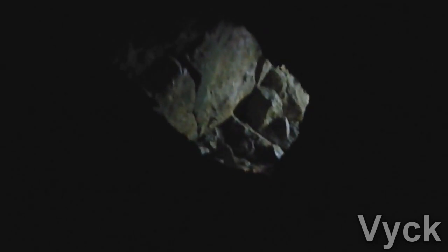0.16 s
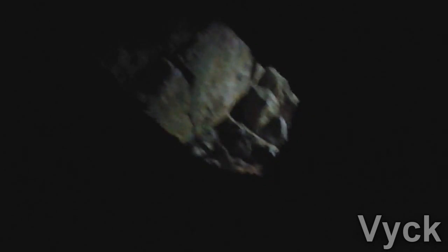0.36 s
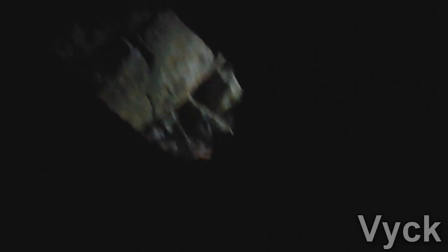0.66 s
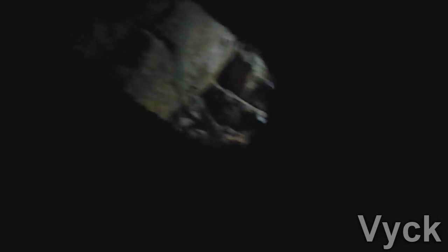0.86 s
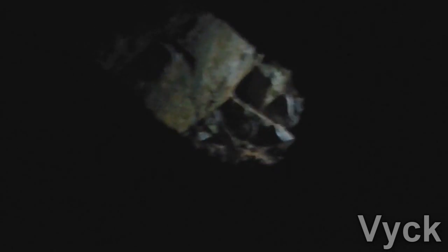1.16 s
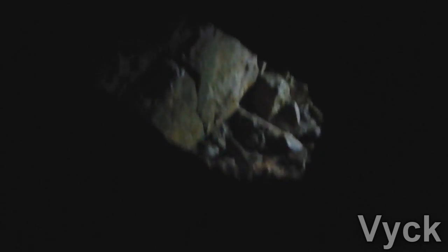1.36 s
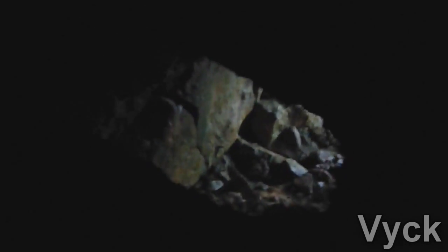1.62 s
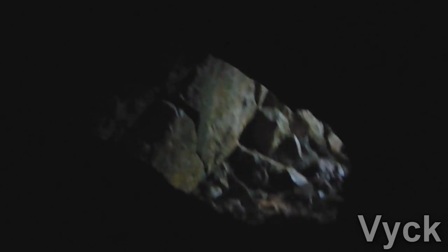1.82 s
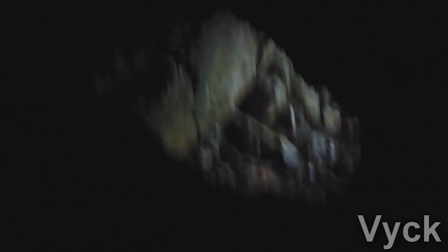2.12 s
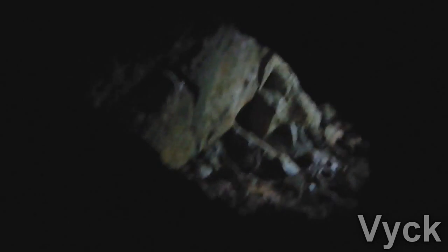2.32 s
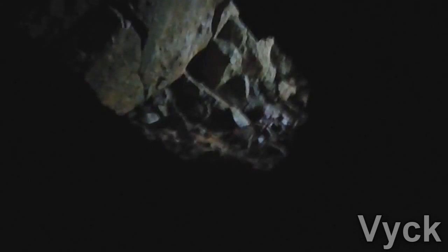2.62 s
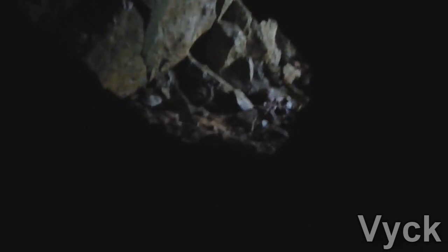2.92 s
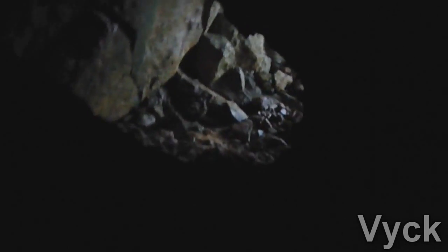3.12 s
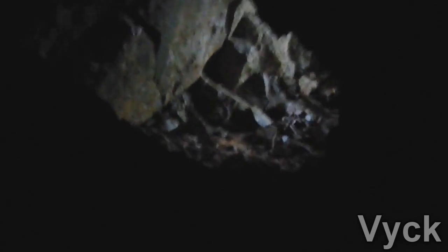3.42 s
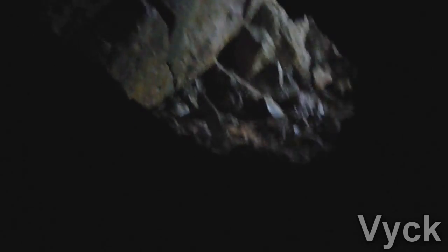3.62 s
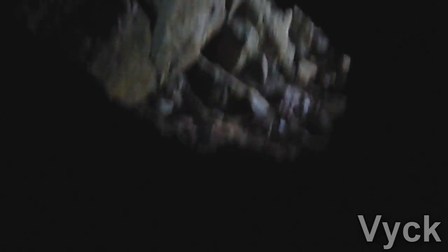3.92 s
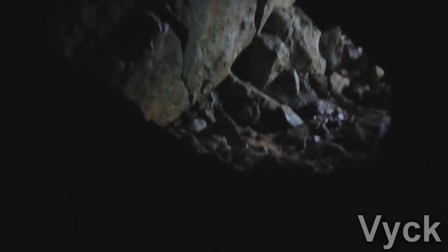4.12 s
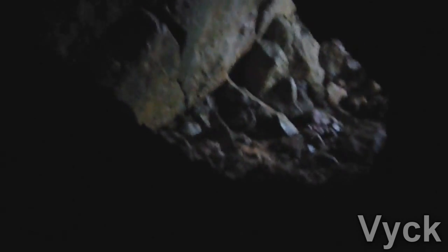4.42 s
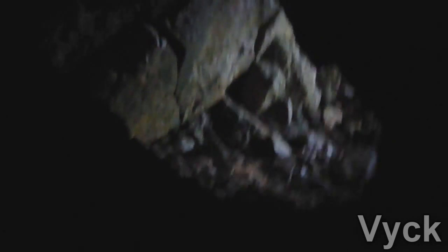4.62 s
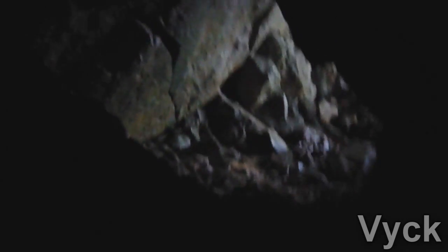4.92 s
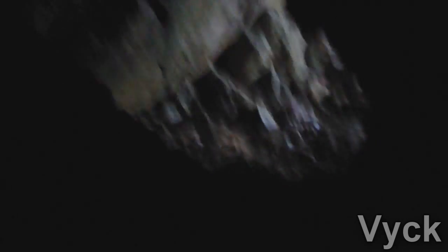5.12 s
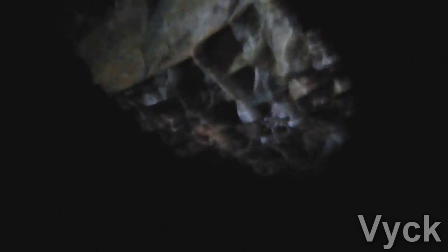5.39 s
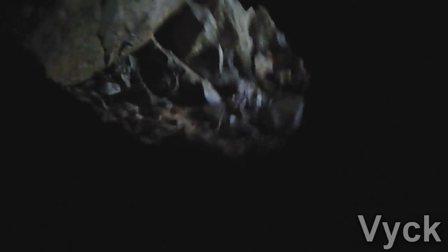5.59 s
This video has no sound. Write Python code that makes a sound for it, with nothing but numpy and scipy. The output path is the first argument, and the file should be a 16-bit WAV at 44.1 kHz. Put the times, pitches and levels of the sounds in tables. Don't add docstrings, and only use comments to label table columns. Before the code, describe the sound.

Someone walks over a heap of broken rock in a mine tunnel, heard close through a cheap, band-limited camera microphone with constant grainy hiss. Footsteps come in uneven bursts: stone clacks, gritty crunches, hollow knocks and low thuds, with small settling trickles between. The middle is busy with dragging; two very loud cracks distort near four seconds, and a strong scraping burst closes it. Rough walls give a brief echo.

```python
import sys
import numpy as np
from scipy import signal
from scipy.fft import rfft, irfft, next_fast_len
from scipy.io import wavfile
from scipy.ndimage import map_coordinates

SR = 44100
rng = np.random.default_rng(int(sys.argv[2]) if len(sys.argv) > 2 else 0)


def makeup_ratio(level_db):
    decades = np.asarray(level_db, float) / 20
    return 10 ** decades


def to_wav(sig):
    pcm = np.clip(np.atleast_2d(sig), -1, 1) * 32767
    pcm = np.round(pcm).astype(np.int16)
    wavfile.write(sys.argv[1], SR, pcm.T)


N = 253575


def unit(x):
    return x / np.sqrt(np.mean(x ** 2) + 1e-20)


def along(points, hz):
    point_hz, value = np.transpose(points)
    return np.interp(np.log(hz + 1), np.log(point_hz + 1), value)


def wobble(rate):
    knots = rng.standard_normal(int(N * rate / SR) + 4)
    return map_coordinates(knots, [np.arange(N) * rate / SR])


def coloured(x, points):
    size = next_fast_len(N + SR // 2)
    response = makeup_ratio(along(points, np.fft.rfftfreq(size, 1 / SR)))
    return irfft(rfft(x, size) * response, size)[..., :N]


def placed(times, sounds):
    at = np.round(times * SR).astype(int)[:, None] + np.arange(sounds.shape[1])
    return np.bincount(at.ravel(), sounds.ravel(), N + SR)[:N]


# (frequency [Hz], level per Hz [dB])
AIR_COLOUR = [(40, -19.5), (150, -10), (450, -1), (700, -4), (1500, -11.5), (4000, 3.5)]


def air():
    hush = unit(coloured(rng.standard_normal(N), AIR_COLOUR))
    return makeup_ratio(-48 + 0.29 * wobble(3.2)) * hush


# (frequency [Hz], time to fall 60 dB [s])
WALL_DECAY = [(150, 0.6), (1000, 0.33), (3500, 0.3)]


def tunnel(x):
    hz, t, noise = signal.stft(rng.standard_normal(SR // 2), SR, nperseg=256)
    fading = makeup_ratio(-60 * t / along(WALL_DECAY, hz)[:, None])
    tail = signal.istft(noise * fading, SR, nperseg=256)[1]
    late = np.pad(x, (150, 0))
    return signal.fftconvolve(late, tail / np.linalg.norm(tail))[:N]


# (time [s], peak level [dB], pitch [Hz], time to fall 60 dB [s])
HEEL_THUDS = [(0.636, -26.5, 190, 0.1), (0.785, -36, 180, 0.11), (1.016, -18.5, 342, 0.049),
              (1.59, -27, 135, 0.21), (1.83, -35, 361.4, 0.15), (1.917, -19, 138.5, 0.03),
              (2.136, -29.5, 146, 0.06), (2.549, -8, 255, 0.035), (2.67, -36, 190, 0.16),
              (2.856, -33, 254, 0.23), (2.911, -22.5, 226.6, 0.037), (3.038, -21, 314, 0.031),
              (3.674, -42, 166, 0.021), (3.817, -60, 136, 0.15), (4.043, -33.5, 152, 0.063),
              (4.149, -27, 213, 0.08), (4.345, -21, 140, 0.068), (4.872, -25.5, 153, 0.086),
              (5.093, -28.5, 193, 0.027), (5.172, -11, 283, 0.083), (5.348, -23.5, 318.6, 0.08),
              (5.529, -27, 328.5, 0.23), (5.6, -23, 285, 0.05), (5.642, -19, 142.5, 0.1)]


def thuds():
    s, db, hz, t60 = np.transpose(HEEL_THUDS)[..., None]
    t = np.arange(6000) / SR
    shape = makeup_ratio(-60 * t / t60) * (1 - np.exp(-t / 0.00078))
    shaken = 0.064 * np.cumsum(rng.standard_normal((len(s), len(t))), axis=1)
    rings = np.sin(2 * np.pi * hz * t + shaken)
    return placed(s[:, 0], makeup_ratio(db + 0.5) * shape * rings)


# (time of the top [s], peak level
# [dB], pitch [Hz])
STONE_NOTES = [(0.747, -19.5, 1143), (0.856, -17, 648), (1.018, -15, 690), (1.047, -12.5, 957),
               (1.065, -16, 940), (1.266, -14, 984), (1.301, -22.5, 784), (1.909, -23.5, 790),
               (2.228, -26.5, 818), (2.531, -19, 774), (2.553, -13.5, 1020), (2.605, -20.5, 880),
               (2.635, -19, 1063), (2.676, -20, 854), (2.765, -18, 860), (2.978, -24, 782),
               (3.092, -16, 947), (3.107, -15.5, 1156), (3.152, -18.5, 1090), (3.246, -19.5, 1093),
               (3.383, -17, 1064), (3.446, -14.5, 1073), (3.454, -14, 1240), (3.478, -21, 1117),
               (3.568, -28.5, 940), (3.634, -27.5, 1010), (3.927, -23.5, 910), (4.241, -26, 1030),
               (4.349, -24.5, 987), (4.789, -24, 1256), (4.87, -25, 1076), (5.022, -30, 1295),
               (5.079, -22, 1280), (5.16, -17.5, 522), (5.182, -14.5, 1147), (5.262, -24.5, 437),
               (5.376, -16, 1080), (5.402, -15, 1080), (5.411, -11.5, 990), (5.43, -15.5, 1115),
               (5.483, -24, 1030), (5.548, -17, 774), (5.616, -18.5, 1090), (5.647, -18, 887),
               (5.706, -21.5, 950),
               (0.331, -36, 1530), (0.746, -23.5, 1505), (0.786, -18.5, 1520), (1.05, -22, 2130),
              (1.112, -22.5, 3370), (1.176, -22, 1840), (1.301, -21, 1730), (1.456, -32, 1775),
              (1.542, -30, 1640), (2.184, -24.5, 2230), (2.368, -30, 1600), (2.543, -23.5, 3270),
              (2.545, -16, 1906), (2.607, -19.5, 2610), (2.682, -16.5, 2655), (2.726, -18.5, 2580),
              (2.831, -23.5, 1676), (2.87, -21, 2590), (2.88, -21, 2420), (2.88, -20, 3280),
              (2.889, -18.5, 1554), (3.043, -25.5, 2550), (3.063, -25, 2410), (3.081, -12, 1780),
              (3.093, -17.5, 2700), (3.114, -14.5, 1770), (3.115, -17, 2790), (3.151, -19, 2020),
              (3.284, -19.5, 2480), (3.285, -23, 3050), (3.299, -22.5, 2250), (3.33, -27, 3090),
              (3.382, -17, 2120), (3.385, -17.5, 1510), (3.42, -20.5, 2320), (3.421, -19, 3070),
              (3.527, -21.5, 2110), (3.567, -24, 1640), (3.604, -24.5, 3240), (3.631, -21.5, 2030),
              (3.72, -24, 2200), (3.759, -23.5, 2980), (3.93, -29, 3040), (3.934, -26, 2620),
              (4.198, -24, 2840), (4.286, -26.5, 3480), (4.341, -18.5, 2510), (4.342, -22, 3240),
              (4.344, -24, 1830), (4.777, -25.5, 3360), (4.87, -25, 1630), (5.021, -22, 2840),
              (5.021, -29.5, 2250), (5.021, -28, 3920), (5.078, -22, 2210), (5.079, -22, 1850),
              (5.308, -22, 2130), (5.374, -16, 2080), (5.377, -13.5, 2550), (5.407, -17.5, 1570),
               (.777, -24, 2900), (.82, -17, 2300), (.824, -18, 1300), (.862, -20, 1500),
                  (1.023, -17, 500), (1.057, -15, 900), (1.069, -17, 2200), (1.147, -19, 800),
                  (1.16, -21, 2900), (1.253, -25, 2500), (1.268, -21, 1700), (1.31, -23, 1050),
                  (1.6, -24, 600), (2.137, -28, 2800), (2.62, -17, 1600), (2.714, -20, 2500),
                  (2.786, -23, 900), (2.859, -23, 1650), (3.255, -19, 1200), (3.41, -19, 1100),
                  (3.508, -20, 2300), (3.857, -21, 1000), (4.161, -19, 1300), (4.17, -19, 1100),
                  (4.178, -22, 1500), (4.19, -21, 1200), (4.3, -27, 2900), (4.39, -29, 2800),
                  (4.426, -29, 1500), (4.775, -23, 2000), (4.825, -27, 2200), (5.179, -18, 330),
                  (5.217, -16, 900), (5.237, -18, 1000), (5.346, -19, 1100), (5.366, -18, 1150),
                  (5.395, -18, 2600), (5.583, -16, 900), (5.61, -17, 600), (5.635, -18, 800),
                  (5.68, -19, 1000)]


def notes():
    s, db, hz = np.transpose(STONE_NOTES)[..., None]
    t = np.arange(900) / SR
    rise_s = .0008 + 0.55 / hz
    u = t / rise_s
    swell = (u / 2) ** 2 * np.exp(2 - u)
    start = (s - 2 * rise_s)[:, 0]
    return placed(start, makeup_ratio(db + 0.3) * swell * np.sin(2 * np.pi * hz * t))


def resonance(f, hz, width_hz):
    return 1j * f * width_hz / (hz * hz - f * f + 1j * f * width_hz)


def stones(rows, push, low_width_hz, high_width_hz):
    s, db, low_hz, high_hz, share_db = np.transpose(rows)[..., None]
    f = np.fft.rfftfreq(push.shape[1], 1 / SR)
    high = np.clip(makeup_ratio(share_db), 0, 1)
    low = np.sqrt(1.02 - high ** 2)
    low_ring = low * resonance(f, low_hz, low_width_hz) ** 2
    high_ring = high * resonance(f, high_hz, high_width_hz) ** 2
    sound = irfft(rfft(push) * (low_ring + high_ring), push.shape[1])
    return placed(s[:, 0], makeup_ratio(db) * sound / abs(sound).max(axis=1, keepdims=True))


# (time [s], peak level [dB], low ring [Hz], high ring [Hz], share of the high ring [dB])
FEW_KNOCK = [(0.613, -50, 1340, 2130, -5), (0.852, -11.5, 638, 1670, -13.5), (1.046, -5, 930, 1650, -18),
             (1.172, -21, 1440, 1960, -8.5), (1.738, -24, 525, 1630, -5.5), (1.902, -18, 755, 1870, -18),
             (2.028, -20, 1590, 2640, -4), (2.484, -23.5, 1550, 1630, -10), (2.707, -11.5, 1630, 2730, 3),
             (2.969, -18, 764, 2590, -3), (3.146, -11.5, 1016, 2050, -18), (3.288, -7, 1035, 2210, 0.5),
             (3.411, -15, 1045, 3000, -7.5), (3.507, -10, 1110, 2400, -3), (3.757, -15, 1084, 2800, 3),
             (3.924, -10.5, 950, 1820, -5.5), (4.281, -15.5, 1026, 2770, -2.5), (4.297, -18, 1050, 2590, 3),
             (4.42, -22, 940, 1710, -9), (4.461, -20.5, 1320, 2830, -0.5), (4.688, -23, 1260, 2720, 1),
             (4.707, -23.5, 1255, 2500, 2), (4.342, -13.5, 1020, 2580, -1.5),
             (4.573, -26.5, 1140, 2840, -2.5), (4.784, -16, 1275, 1740, -8), (5.179, -6, 1160, 2070, -11),
             (5.406, -4.5, 1125, 1720, -7)]
# (time [s], peak level [dB], low ring [Hz], high ring [Hz], high share [dB])
HANDFUL_CRUNCH = [(0.643, -18, 1403, 2160, -5), (1.058, -6.5, 956, 1620, -7), (1.107, -13, 912, 1640, -4),
                  (1.26, -16, 1100, 1900, -5), (1.454, -30, 716, 1760, -5.5),
                  (1.833, -19.5, 620, 1580, -11), (2.134, -16.5, 700, 2020, 5.5),
                  (2.365, -18, 555, 1550, -5), (2.538, -5.5, 1100, 1630, -4), (2.673, -14.5, 804, 1770, -2),
                  (2.876, -10.5, 1650, 3100, -2.5), (3.188, -15.5, 1246, 2020, -14.5),
                  (3.255, -15, 1120, 1970, -15), (3.436, -6, 1057, 2250, -9), (3.856, -12, 890, 2960, -9),
                  (4.053, -16.5, 1040, 2500, -5), (4.546, -25, 863, 2360, -8),
                  (4.766, -11.5, 1210, 2090, -3), (4.821, -15.5, 1074, 2120, -2.5),
                  (5.099, -17, 970, 1800, -14), (5.305, -19, 890, 2170, -8), (5.344, -14, 1126, 2110, -14),
                  (5.428, -15, 1124, 1660, -4), (5.617, -12.5, 915, 2650, -4.5)]
# (time [s], peak level [dB], low ring [Hz], high ring [Hz], high share [dB])
MANY_SLIDE = [(1.541, -22.5, 1550, 1580, 1), (1.592, -19, 766, 1600, -5.5), (2.177, -16, 890, 2240, -8),
              (2.218, -16, 943, 1710, -2.5), (2.452, -23, 1240, 2060, -6), (2.869, -23, 1560, 3230, -8),
              (3.035, -15, 1010, 1650, -7.5), (3.077, -10, 953, 1680, -5), (3.112, -5, 1083, 1705, 2.5),
              (3.44, -9, 1070, 1890, -16), (3.717, -16, 904, 2270, -1.5), (3.792, -14, 766, 1870, -3),
              (4.078, -17.5, 1105, 2056, -15.5), (4.239, -26.5, 960, 1860, -16),
              (4.668, -19.5, 473, 1700, -6.5), (5.152, -15.5, 530, 1650, -19),
              (5.208, -14, 1340, 2400, -2.5), (5.558, -11.5, 715, 2710, -7.5),
              (5.588, -11, 1080, 2150, -0.5)]


def crunches():
    t = np.arange(4096) / SR
    rows = [*FEW_KNOCK, *HANDFUL_CRUNCH, *MANY_SLIDE]
    counts = [len(FEW_KNOCK), len(HANDFUL_CRUNCH), len(MANY_SLIDE)]
    swell_s = np.repeat([.003, 0.0067, .014], counts)[:, None]
    u = t / swell_s
    sign, size = rng.standard_normal((2, len(rows), len(t)))
    push = sign * makeup_ratio(5 * size) * np.sqrt(u) * np.exp(-u)
    return makeup_ratio(-3) * stones(rows, push, 700, 1500)


# (time [s], peak level [dB], low ring [Hz], high ring [Hz], high share [dB])
SINGLE_BLOWS = [(0.266, -24, 1580, 1670, 1), (0.329, -23.5, 870, 1687, -9), (0.556, -30, 1310, 1680, -9.5),
                (0.744, -12, 1500, 1530, -2), (0.783, -10.5, 1340, 1570, -7.5), (0.814, -2, 890, 1694, -3),
                (1.017, -11, 643, 1600, -14), (1.175, -16.5, 1430, 1900, -2.5),
                (1.298, -14.5, 833, 1690, -4.5), (2.528, -10, 688, 1740, -12), (2.605, -5, 950, 2590, -3),
                (2.83, -19.5, 1000, 1690, -5.5), (3.38, -9, 1450, 2130, -11.5), (3.526, -5, 1500, 2190, 0),
                (3.566, -8.5, 850, 1670, -2.5), (3.601, -15, 1090, 3220, 0), (3.629, -17, 946, 2010, -8),
                (4.197, -10.5, 1330, 2940, -2.5), (4.338, -15.5, 1020, 2520, -3.5),
                (4.868, -18.5, 1040, 1590, -9), (5.02, -13.5, 1330, 2650, -2), (5.076, -8, 1264, 1850, -2),
                (5.374, -5.5, 1000, 2370, -6), (5.481, -22, 1150, 2140, -14.5)]
# (time [s], peak level [dB], low ring [Hz], high ring [Hz], high share [dB])
HARD_BLOWS = [
    (2.9172, -3, 1020, 950, -11),
    (2.634, -11.5, 1040, 1700, 0.5),
    (2, -11, 1400, 2600, 0.5),
    (4.1558, -2.5, 1900, 1500, -11),
    (2.55, -2, 930, 1800, -4),
    (4.4, -26.5, 1135, 2100, -2),
]
# (time [s], peak level [dB], low ring [Hz], high ring [Hz], high share [dB])
OVERLOADING_BLOWS = [
    (3.88495, 5.2, 1900, 2800, -1),
    (4.1535, 1.6, 1800, 1850, -9),
]


def clacks():
    rows = np.array([*SINGLE_BLOWS, *HARD_BLOWS, *OVERLOADING_BLOWS])
    t = np.arange(4096) / SR
    hard = np.arange(len(rows))[:, None] >= len(SINGLE_BLOWS)
    rattle_t60_s = np.where(hard, 0.018, 0.054)
    push = 0.077 * rng.standard_normal((len(rows), len(t))) * makeup_ratio(-60 * t / rattle_t60_s)
    push[:, :30] = 0
    push[:, 30] = 1
    return stones(rows, push, np.where(hard, 900, 610), np.where(hard, 2100, 1150))


# (time [s], middle stones level [dB], time to fade [s], grit over them [dB], large stones over them [dB])
SOLE_LANDINGS = [
    (0.001, -48.5, .1, 4, 1),
    (1.032, -22.5, 0.27, -1.5, -6.5),
    (1.83, -39, 0.14, 5.5, -10.5),
    (2.531, -24, .25, 3.5, -7),
    (2.531, -21, .07, 1, -5),
    (4.165, -20, 0.046, -14, -15.5),
    (4.342, -30, 0.1, 5, 1),
    (4.869, -35.5, 0.12, 2.5, 5),
    (5.08, -26.5, 0.055, 3, -8.5),
]
# (middle time [s], middle stones level [dB], length [s], grit over them [dB], large stones over them [dB])
SOLE_DRAGS = [(.65, -34.5, 0.09, -1.5, -1), (.73, -33, 0.17, 1.5, 0.5), (.84, -29.5, 0.18, 2, -7),
              (1.17, -32.5, 0.083, 10.5, -7.5), (1.29, -34, 0.15, -4.5, -0.5), (1.6, -32, 0.08, -5, -5),
              (1.92, -32, 0.21, -5.5, -4), (2.19, -31.5, 0.26, 1, -5), (2.62, -28.5, 0.18, 3, -9),
              (2.73, -34, 0.16, 9.5, 2.5), (2.875, -29, 0.059, 0.5, -9), (3.12, -24, 0.2, 1, -5),
              (3.25, -32.5, 0.15, 7, -6), (3.35, -28.5, 0.26, 1.5, -9), (3.44, -28.5, 0.18, 4.5, 0.5),
              (3.86, -33, 0.3, 0.5, -4.5), (4.07, -35, 0.19, 3, -1), (4.79, -35.5, 0.12, 2, -10.5),
              (5.2, -24, 0.12, -1, -1.5), (5.26, -27, 0.094, 0, 0.5), (5.39, -22, 0.1, 2.5, -4.5),
              (5.51, -28.5, 0.45, 1.5, -0.5), (5.62, -19.5, 0.19, -2.5, -7), (5.73, -27, 0.26, 0.5, 0)]
# (middle time [s], middle stones level [dB], length [s], grit over them [dB], large stones over them [dB])
HEAP_TRICKLES = [(.12, -50.5, 0.28, -6, -4), (0.421, -49, 0.71, -4.5, -5.5), (.96, -41, 0.17, 3.5, -1.5),
                 (1.483, -41.5, 0.32, -1, -3), (1.73, -42.5, 0.16, 2.5, -8), (2.049, -41.5, 0.25, 6.5, -1),
                 (2.37, -43, 0.53, 0, 4), (2.97, -34, 0.2, -6, -10), (3.56, -43, 0.19, 12, 1),
                 (3.72, -39, 0.58, 3.5, -2), (4.237, -36.5, 0.23, 3.5, 3), (4.5, -43, 0.55, 3, -3),
                 (4.67, -40.5, 0.37, 2, -0.5), (5.02, -43.5, 0.18, 1, -5.5)]


def pressure():
    t = np.arange(0, N, 32) / SR
    land, swell = np.array(SOLE_LANDINGS), np.array([*SOLE_DRAGS, *HEAP_TRICKLES])
    after = t - land[:, :1]
    rise_s, fade_db, edge_db = 0.0058, 18.5, 11.5
    fading = -fade_db * np.maximum(after / land[:, 2:3], -after / rise_s)
    arched = -edge_db * (2 * (t - swell[:, :1]) / swell[:, 2:3]) ** 2
    rows = np.vstack([land, swell])
    power = makeup_ratio(2 * (rows[:, 1:2] + np.vstack([fading, arched])))
    shares = makeup_ratio(2 * np.array([0 * rows[:, 3], rows[:, 3], rows[:, 4]]))
    return [np.interp(np.arange(N) / SR, t, 10 * np.log10(p + 1e-9)) for p in shares @ power]


def grains(hz, octaves, cycles, spread_db, count, size):
    when, odds = rng.random((2, count))
    scattered = hz * 2 ** (octaves * rng.standard_normal((count, 1)))
    pitch = np.maximum(scattered, 110)
    turns = pitch * np.arange(size) / SR
    build = 1 - np.exp(-turns / 0.7)
    rings = np.sin(2 * np.pi * turns) * makeup_ratio(-60 * turns / cycles) * build
    strength = makeup_ratio(np.minimum(-spread_db * np.log(1 - odds), 14))
    return unit(placed(when * N / SR, strength[:, None] * rings))


def tread():
    middle_db, grit_db, large_db = pressure()
    jerk = wobble(35)
    middle = grains(1000, .45, 16, 3.1, count=7000, size=560)
    grit = grains(2400, .45, 13, 2.2, count=16000, size=280)
    cobbles = grains(450, .38, 17, 1.9, count=2500, size=1200)
    large = grains(170, 0.36, 12, 1.7, count=1200, size=2600)
    cobbles_db = (middle_db + large_db) / 2 - 4.0
    return (makeup_ratio(middle_db + 1.6 * jerk + 1.7 * wobble(24)) * middle
            + makeup_ratio(grit_db + 1.4 * jerk + 1.4 * wobble(20)) * grit
            + makeup_ratio(cobbles_db + 2.2 * jerk) * cobbles
            + makeup_ratio(large_db - 3.5 + 0.67 * jerk + 1.5 * wobble(12)) * large)


def scene():
    hits = clacks() + crunches() + thuds() + notes()
    grinding = tread()
    echo = tunnel(makeup_ratio(-12.5) * hits + makeup_ratio(-10.5) * grinding)
    lull_s, lull_length_s = .191, .0085
    from_lull = np.arange(N) / SR - lull_s
    lull = np.clip((2 * from_lull / lull_length_s) ** 4, .1, 1)
    return lull * (hits + makeup_ratio(-1.0) * grinding + echo + air())[None]


def low_pass(x):
    return signal.sosfilt(signal.butter(12, 12300, fs=SR, output="sos"), x)


# (frequency [Hz], level [dB])
MICROPHONE_COLOUR = [(30, -26), (70, -5), (100, -11), (140, 0), (200, 0), (600, -4), (1100, 0),
                     (1400, -0.5), (2500, -2), (3300, -0.5), (3900, -3.5), (6000, -39.5)]
# (frequency [Hz], level [dB])
SAMPLE_SMOOTHING = [(2000, -0.5), (3000, -0.5), (3600, -2), (4000, -4.5), (4400, -12), (4800, -23.5),
                    (5000, -30.5), (5200, -38), (5400, -94.5)]
# (frequency [Hz], level [dB])
EDGE_SMOOTHING = [(5500, 0), (8000, -2), (12500, -9)]


def record(dry):
    stored_rate_hz, step, offset = 8000, .0074, -.0663
    count = N * stored_rate_hz // SR
    heard = signal.resample(coloured(dry[0], MICROPHONE_COLOUR), count)
    stored = np.fft.fft(step * np.round(heard / step))
    bins = np.arange(N // 2 + 1)
    smoothing = makeup_ratio(along(SAMPLE_SMOOTHING, bins * SR / N))
    mirrored = stored[bins % count] * smoothing
    played = irfft(mirrored, N) * N / count + offset
    clipped = np.clip(played, -.965, .94)
    return low_pass(coloured(clipped, EDGE_SMOOTHING)[None])


dry = scene()
out = record(dry)
to_wav(out)
```